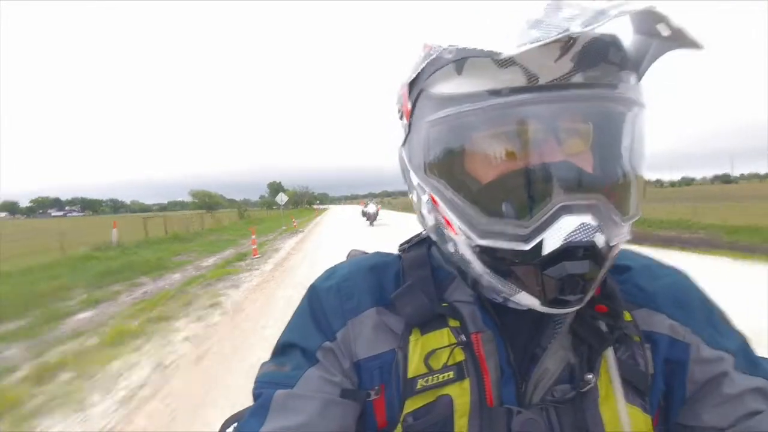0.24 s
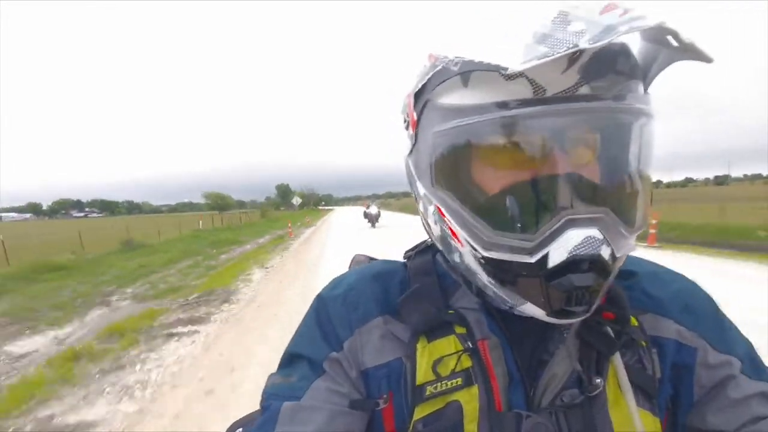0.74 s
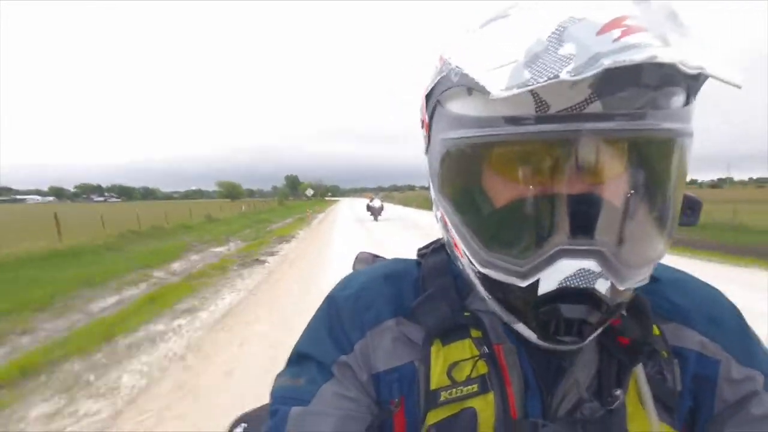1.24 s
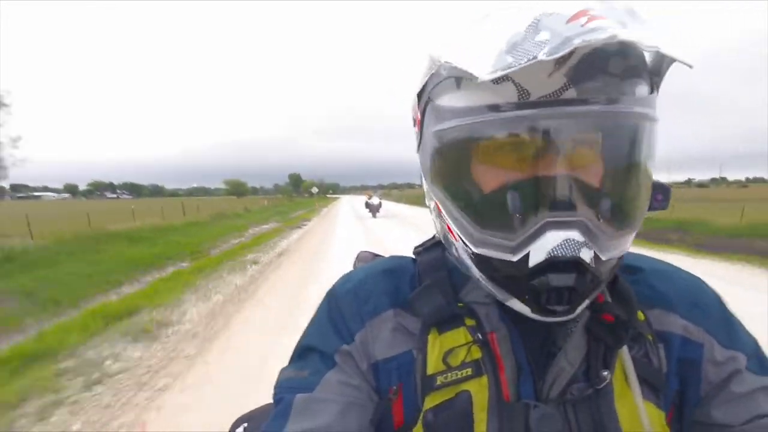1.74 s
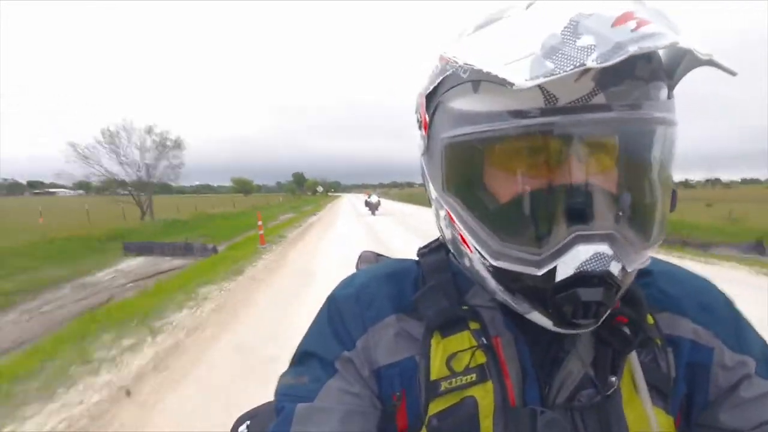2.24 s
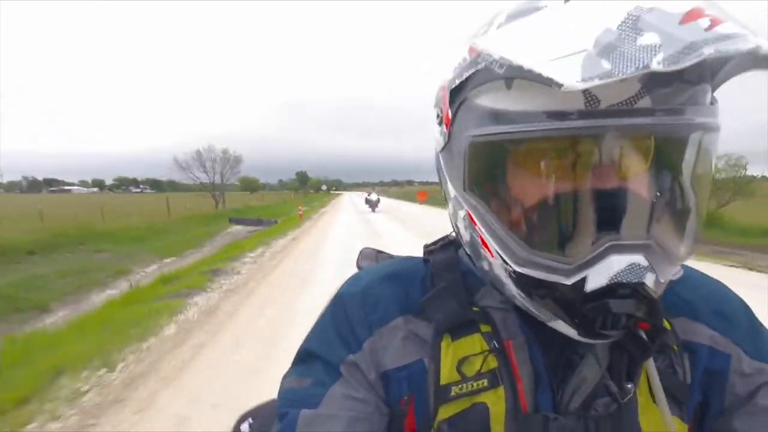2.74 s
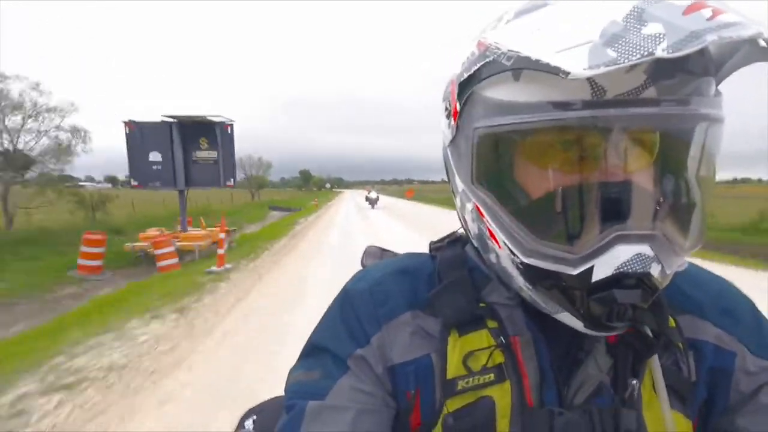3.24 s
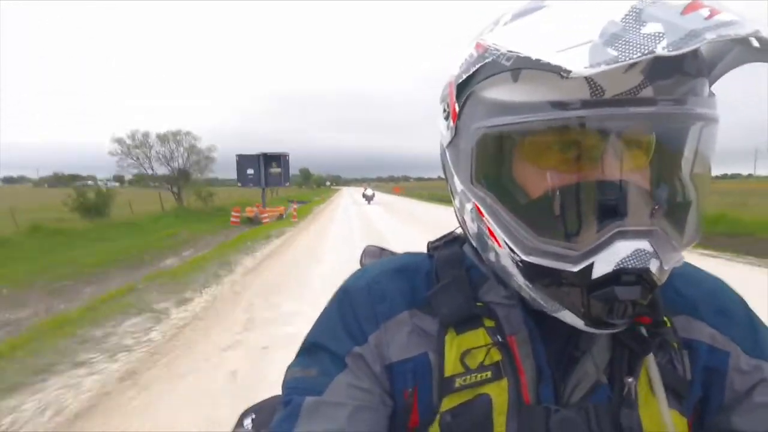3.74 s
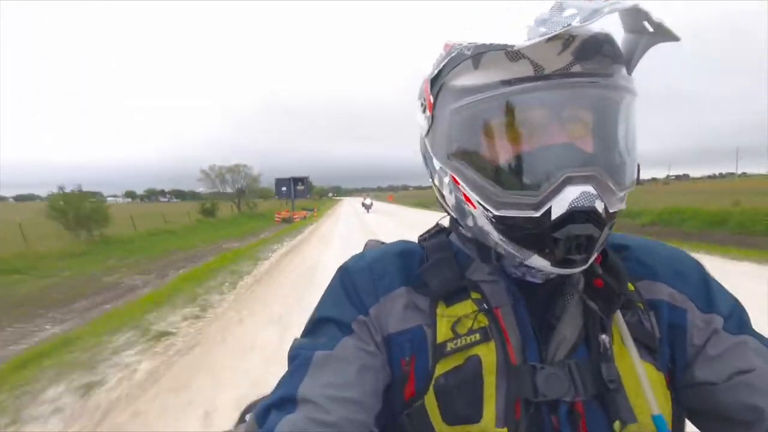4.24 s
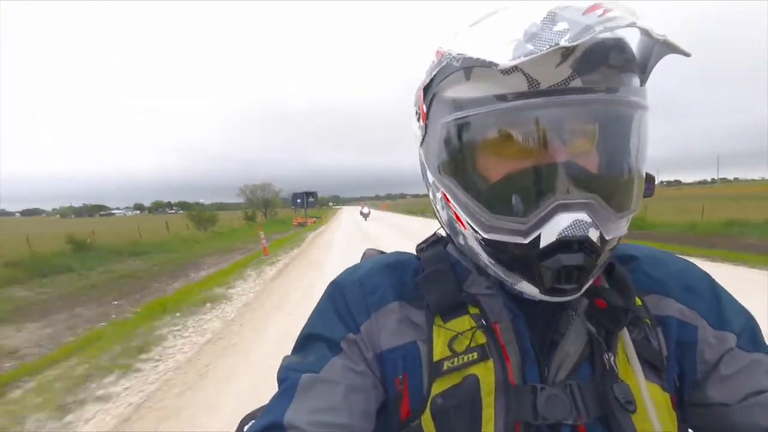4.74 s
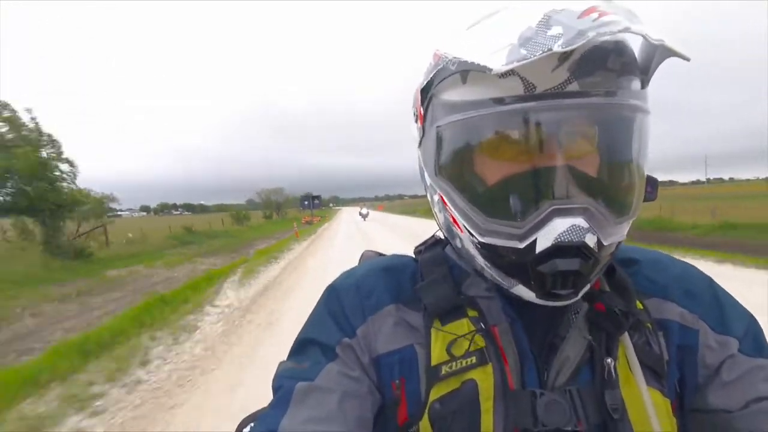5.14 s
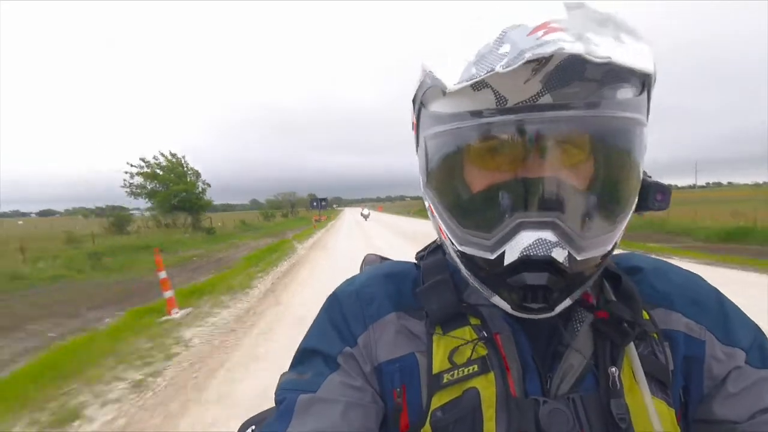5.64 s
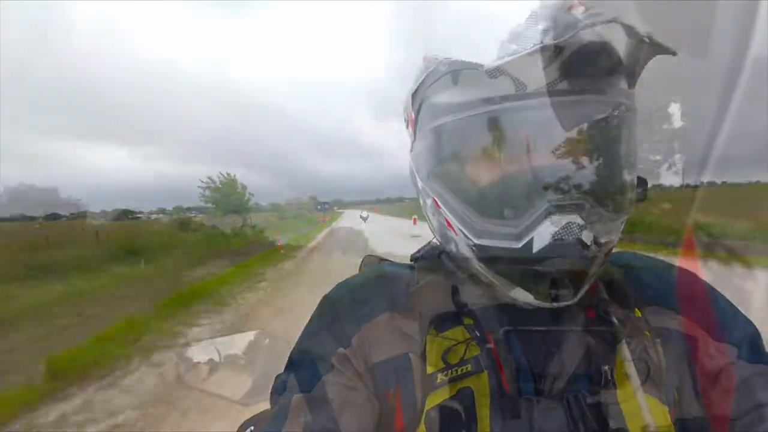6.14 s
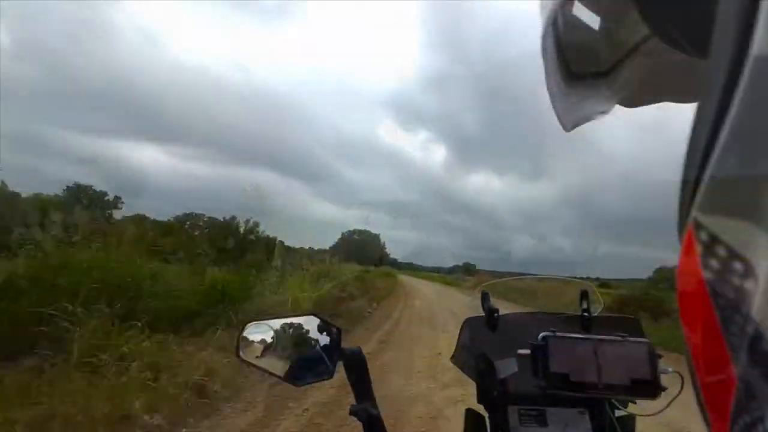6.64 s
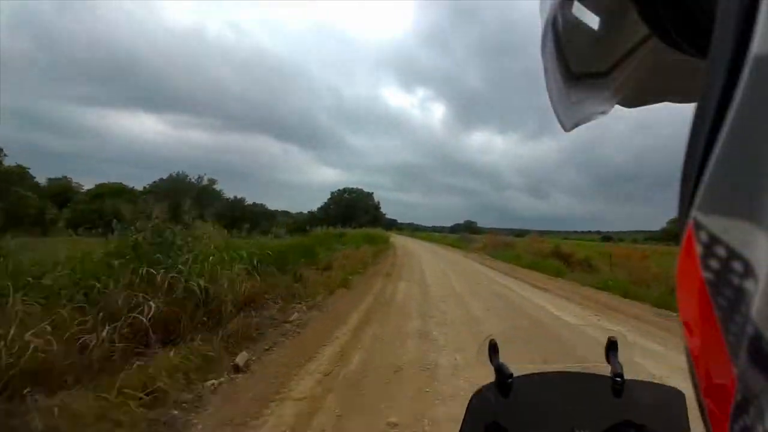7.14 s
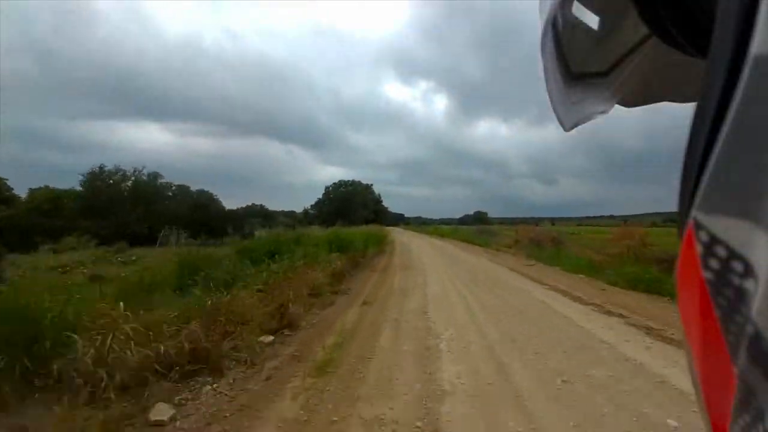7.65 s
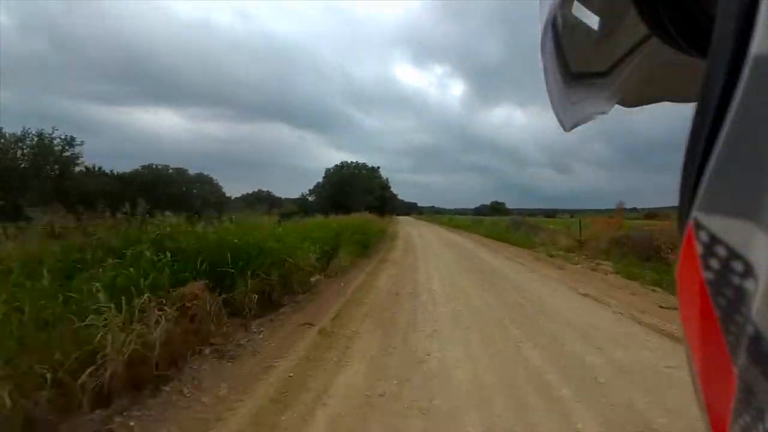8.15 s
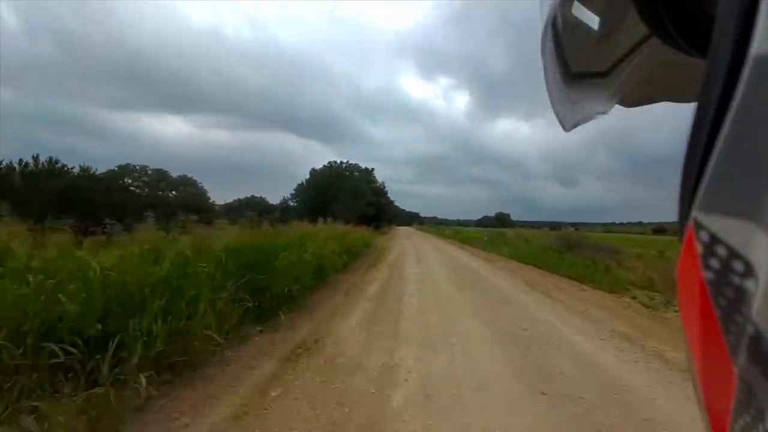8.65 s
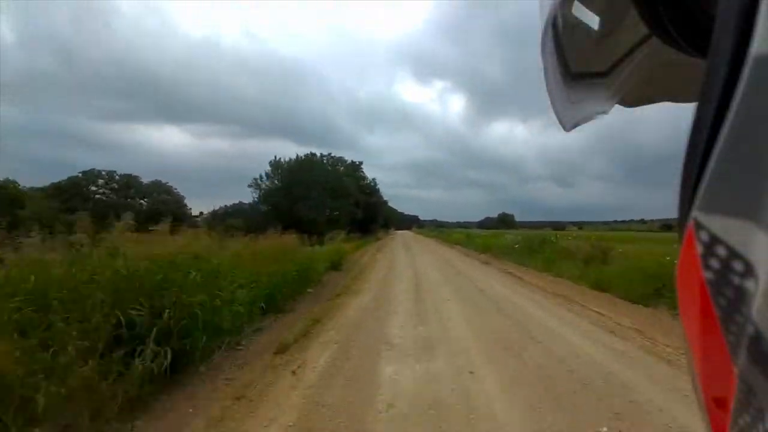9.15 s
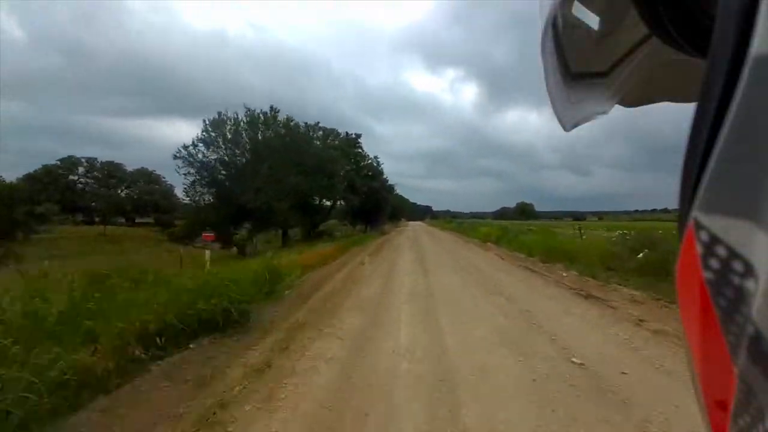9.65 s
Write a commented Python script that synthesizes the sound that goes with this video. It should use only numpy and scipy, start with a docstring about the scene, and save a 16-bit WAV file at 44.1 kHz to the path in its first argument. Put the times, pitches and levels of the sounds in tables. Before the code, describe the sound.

From 0 s, a microphone on a motorcycle's handlebar is pounded by full airstream: deep thudding and rumbling wind, fluttering bass and a thinner layer of roar and hiss. A twin-cylinder engine hums beneath, rising slowly. Around 1.2 s the throttle opens with a raspy, growling surge, and pitch climbs until about 3.8 s, when the throttle closes and the engine thins into coasting, gradually falling. Stones knock the housing at 0.7 s, in a cluster at 3.0-3.5 s, and repeatedly from 4.2 to 6.2 s; sharper grit snaps at 2.1-3 s. Between 6.1 and 6.7 s this loud scene fades out. A far quieter, sheltered place beside the helmet takes over: soft short wind buffets from 6.8 to 8.6 s, a few tiny clicks, then a steady intake drone strengthening and rising slightly amid hollow, airy gravel-road rush, growing gently until 9.9 s.

```python
"""A gravel road on a twin-cylinder motorcycle, heard first at the handlebar in the full airstream.
Exhaust tones and noisy firing puffs pull under six bands of turbulent noise, from thud to hiss.
This fades out as a much quieter, sheltered place beside the helmet fades in: noise gusts buffet softly,
shaped noise makes the road rush, and sines locked to the engine cycle make the intake drone.
Small decaying rings make the ticks of stones and grit."""
import sys
import numpy as np
from scipy import signal
from scipy.fft import rfft, irfft, next_fast_len
from scipy.io import wavfile
from scipy.ndimage import uniform_filter1d, minimum_filter1d, map_coordinates

SR = 44100
rng = np.random.default_rng(int(sys.argv[2]) if len(sys.argv) > 2 else 0)


def waveform_to_disk(signal):
    """Save audio, clipped to [-1, 1], as 16-bit WAV at the path in sys.argv[1]."""
    frames = np.transpose(np.atleast_2d(signal))
    scaled = np.clip(frames, -1, 1) * 32767
    samples = np.round(scaled).astype(np.int16)
    wavfile.write(sys.argv[1], SR, samples)


N = 436149

# Engine speed at each place: (time [s], four-stroke cycles [1/s])
BAR_SPEED = [(0, 26.5), (.4, 27.25), (.7, 27.9), (1, 28.5), (1.2, 29.8), (1.95, 31.1), (2.7, 33.1),
             (3.2, 34.6), (3.7, 35.8), (4.2, 36.4), (5.65, 33.4), (6.8, 31.9)]
HELMET_SPEED = [(7.5, 27.6), (8.1, 28), (8.65, 29.25), (9, 29.6), (9.5, 30.2), (9.89, 30.8)]
# Engine effort at the handlebar: (time [s], throttle level [dB])
BAR_THROTTLE = [(0, -20), (.9, -9), (1.22, 2.5), (1.75, 2), (2.1, -2.5), (2.7, 0), (3.6, -2), (3.95, -24),
                (6.8, -24)]
# Engine tones at multiples 2 to 27 of the cycle, before throttle and fairing: (rms level [dB])
ORDER_LEVELS = [-23, -24, -22, -19, -22, -27, -27, -44, -43, -44, -48, -47, -33, -37, -35, -38, -40, -49,
                -47, -40, -38, -46, -43, -46, -49, -49]
# How the fairing passes the engine's tones: (frequency [Hz], gain [dB])
FAIRING = [(88, -2), (101, 4), (120, -1), (152, 3.5), (180, -3), (275, -1), (415, -5), (460, 1), (490, 1),
           (530, -4), (590, 0), (645, 4), (690, -4), (740, 1), (780, 1), (830, -9)]
# Resonances of the intake: (frequency [Hz], width [Hz], level [dB])
AIRBOX = [(468.7, 80, 4), (662, 177, -4.5), (969, 100, -10), (1450, 160, -16.5)]
# Tones that stand out at part throttle: (multiple of the cycle, peak level [dB])
WHINES = [(20, -36), (23, -40)]
# Tones that stay when coasting: (multiple of the cycle, peak level [dB])
COAST_TONES = [(14, -50), (15, -46), (20, -56)]

# Low wind bands at the handlebar: (time [s], thud level [dB], rumble level [dB], flap level [dB])
BAR_BASS = [(0, -13.5, -13, -37), (.4, -13.5, -15, -24.5), (.65, -14.5, -13, -33), (1.3, -20, -12, -32),
            (2.06, -20, -12, -22.5), (2.3, -13, -17, -28), (3, -16.5, -10.5, -19.5),
            (3.5, -14, -17.5, -22.5), (4.3, -18, -10.5, -18), (4.7, -15, -11, -20.5),
            (5.9, -18, -12.5, -30.5), (6.25, -18.5, -17.5, -23), (6.8, -17, -24, -45)]
# Upper wind bands at the handlebar: (time [s], roar level [dB], hiss level [dB])
BAR_TREBLE = [(0, -39.5, -45), (.55, -37.5, -44), (.75, -35.5, -42), (1.27, -35.5, -40),
              (2.42, -36.5, -38.5), (2.9, -35, -38), (3.7, -43.5, -39), (4.35, -38, -38.5),
              (4.7, -40, -40.5), (6, -40, -44.5), (6.8, -42, -48.5)]
# Brief dips of the low wind: (time [s], half-width [s], depth [dB])
WIND_DIPS = [(.508, .015, 16), (5.486, .01, 9)]
# Relative wind spectra, deepest band first: (frequency [Hz], density [dB per Hz])
THUD = [(8.8, -43), (15, -4.5), (130, -4), (170, -39.5), (290, -120)]
RUMBLE = [(47, -24), (80, -2), (172, 2.5), (221, -3.5), (260, -22.5), (340, -21.5), (570, -120)]
FLAP = [(140, -31.5), (230, 2.5), (366, -11), (521, -26.5), (600, -36.5), (780, -62), (1320, -120)]
GROWL = [(240, -33.5), (400, -5), (512, -2), (568, -9.5), (787, -8.5), (1400, -12), (1820, -48),
         (3080, -120)]
ROAR = [(760, -16.5), (1300, -9.5), (1430, -4.5), (2540, -6), (4500, -22), (5850, -33), (9900, -120)]
HISS = [(2060, -8), (3500, -3), (4360, -8), (5420, -3.5), (7060, -6.5), (9900, -23.5), (11300, -33),
        (14700, -58), (22000, -120)]

# Stones on the housing: (time [s], crack peak [dB], body relative to crack [dB], body frequency [Hz])
STONES = [(0.7143, -20, -8, 900), (1.341, -30, 11, 650), (1.475, -28, 9, 650), (3.0034, -21, 7, 750),
          (3.108, -27, 7, 1400), (3.339, -27, 6, 900), (3.3967, -26, 5, 1200), (3.424, -26, 8, 800),
          (3.4989, -22, 8, 620), (4.1834, -23, -6, 900), (4.6049, -19, 0, 720), (4.649, -30, 8, 950),
          (4.7262, -27, 3, 1100), (4.948, -31, 11, 950), (5.268, -27, -1, 900), (5.3394, -32, 12, 780),
          (5.7208, -30, 10, 760), (5.8896, -29, 6, 1100), (6.2329, -25, 4, 700), (8.597, -43, 6, 720)]
# Sharper snaps of grit: (time [s], peak level [dB], frequency [Hz])
GRIT = [(2.119, -26, 5350), (2.149, -28, 5350), (2.2124, -28, 5350), (2.4304, -25, 5350),
        (2.795, -27, 5350), (2.9522, -27, 5350), (6.785, -55, 4250), (6.835, -59, 5500), (7.003, -54, 6000),
        (7.44, -58, 5600)]

# Engine effort at the helmet: (time [s], drone level [dB])
HELMET_ENGINE = [(7.3, -16), (7.6, -7), (8, -3), (8.45, 0), (9.3, -.5), (9.89, 1)]
# Intake drone before the effort is added: (multiple of the cycle, rms level [dB])
HELMET_DRONE = [(12, -63), (17, -56), (18, -54), (19, -52), (20, -53.5), (21, -63), (22, -61)]
# Gusts round the helmet: (start [s], length [s], level [dB])
HELMET_GUSTS = [(6.795, 0.01, -45), (6.95, 0.05, -41), (7.06, 0.015, -37), (7.14, 0.03, -39),
                (7.2, 0.015, -38), (7.335, 0.01, -39), (7.554, 0.048, -45.5), (7.737, 0.12, -40),
                (7.907, 0.071, -45), (8.003, 0.025, -36.5), (8.06, 0.085, -38), (8.2, 0.08, -39),
                (8.33, 0.06, -41), (8.47, 0.02, -43), (8.574, 0.02, -46)]
# Relative spectra of the buffeting and road rush: (frequency [Hz], density [dB per Hz])
BUFFET = [(24, -55), (40, -21), (80, 3), (150, 4.5), (262, 1.5), (533, -1), (729, -10), (1200, -9.5),
          (1560, -52), (2640, -120)]
RUSH = [(150, -33), (250, -15.5), (344, -1), (466, -7), (564, -5), (694, -4), (1330, -11.5), (1560, -6),
        (2520, -13.5), (3310, -24), (6680, -33), (7580, -42), (11300, -47.5), (14700, -84), (22000, -120)]
# Resonances of a hollow by the helmet: (frequency [Hz], width [Hz], level [dB])
HELMET_HOLLOW = [(1572, 190, 0), (2565, 270, -9.5)]

OPEN_S, SHUT_S = 1.16, 3.78  # throttle opened wide, throttle closed
RASP_DB, RASP_COAST_DB = -32, 8  # level before the blip, loss when coasting
BLIP_DB, BLIP_S = 10, 0.66  # extra rasp at the opening, its decay time
GROWL_DB, GROWL_SINKS, GROWL_COAST_DB = -33, 0.83, 6  # start level, dB per s until shut, coasting loss
FADE_START_S, FADE_END_S, FADE_POWER = 6.14, 6.737, 1.45  # handlebar fade-out
RISE_START_S, RISE_S = 6.19, 1  # helmet fade-in: start, length
GUST_ATTACK_S, GUST_RELEASE_S, LULL_DB = 0.0049, 0.036, -48  # the lull is the floor between gusts
GUST_HISS_DB = -30.5  # thin hiss relative to its gust
RUSH_DB, RUSH_GROWS = -46, 1  # gain when the fade-in ends, steady creep in dB per s
HOLLOW_DB = -8  # hollow band relative to the rush
HELMET_CUT_HZ = 55  # the helmet microphone loses the bass below about here
KNEE, SQUEEZE = 0.71, 0.48  # limiter threshold (full scale 1), share of the excess in dB taken away
TOP_HZ = 14900


def handlebar():
    """The pulling engine in the full airstream, fading away together."""
    fade = (1 - ramp(FADE_START_S, FADE_END_S - FADE_START_S)) ** FADE_POWER
    return fade * (handlebar_engine() + handlebar_wind())


def handlebar_engine():
    """Cycle-locked tones, with uneven firing puffs ringing the intake as rasp."""
    t = np.arange(N) / SR
    (rate,), (throttle_db,) = curves(BAR_SPEED), curves(BAR_THROTTLE)
    angle = cycle_angle(rate)
    coasting = closed_throttle()
    part_throttle = ramp(0, 0.5) * (1 - ramp(OPEN_S, 0.1))

    blip = ramp(OPEN_S - 0.15, 0.15) * np.exp(-np.maximum(t - OPEN_S, 0) / BLIP_S)
    rasp_db = RASP_DB + BLIP_DB * blip - RASP_COAST_DB * coasting
    pulses = firings(rate, second_db=-1.5, jitter=0.01, scatter_db=0.5)
    puffs = rasped(pulses, rough=0.52 + coasting, puff=0.008)

    engine = tones(rate, throttle_db, waver_db=1.6)
    engine += ramp(0, 0.38) * amp(rasp_db) * resonant(puffs, AIRBOX)
    for order, db in WHINES:
        engine += part_throttle * amp(db + 1.1 * wobble(6)) * np.sin(order * angle)
    for order, db in COAST_TONES:
        engine += coasting * amp(db + 3 * wobble(5)) * np.sin(order * angle)
    return engine


def tones(rate, throttle_db, waver_db):
    """Multiples of the cycle, each wavering by itself; the higher ones follow the throttle more."""
    angle, out = cycle_angle(rate), np.zeros(N)
    for order, db in enumerate(ORDER_LEVELS, start=2):
        follow = np.clip(order / 15 - 0.15, 0.25, 1.5)
        fairing_db = np.interp(order * rate, *np.transpose(FAIRING))
        level = amp(db + fairing_db + follow * throttle_db + waver_db * wobble(5.02))
        phase = order * angle + 0.27 * wobble(9) + rng.uniform(0, 2 * np.pi)
        out += np.sqrt(2) * level * np.sin(phase)
    return out


def firings(rate, second_db, jitter, scatter_db):
    """Two firings a cycle, 270 and 450 crank degrees apart, each a little off in time and size."""
    turns = np.cumsum(rate) / SR
    cycle = np.arange(int(turns[-1]))
    luck = rng.standard_normal((len(cycle), 4))  # two columns of timing, two of size
    pulses = np.zeros(N)
    for k, (lag, db) in enumerate([(0, 0), (3 / 8, second_db)]):
        firing_turn = cycle + lag + jitter * luck[:, k]
        at = np.interp(firing_turn, turns, np.arange(N)).astype(int)
        pulses[at] += amp(db + scatter_db * luck[:, k + 2])
    return pulses


def rasped(pulses, rough, puff):
    """Each firing also lets out noise decaying over puff seconds; rough is its share of the power."""
    gate = signal.lfilter([1], [1, -np.exp(-1 / (puff * SR))], pulses)
    rough = np.clip(rough, 0, 1)
    noise = unit(gate * rng.standard_normal(N))
    return np.sqrt(1 - rough) * unit(pulses) + np.sqrt(rough) * noise


def handlebar_wind():
    """Six bands of turbulence, from the deepest thudding to the hiss; the low ones dip briefly."""
    t = np.arange(N) / SR
    (thud_db, rumble_db, flap_db), (roar_db, hiss_db) = curves(BAR_BASS), curves(BAR_TREBLE)
    growl_db = GROWL_DB - GROWL_SINKS * np.minimum(t, SHUT_S) - GROWL_COAST_DB * closed_throttle()
    dip_db = sum(db * np.exp(-((t - s) / width) ** 2) for s, width, db in WIND_DIPS)

    wind = amp(thud_db) * air(THUD, patchy_db=1.0, flutter_db=0.3, flutter_rate=19)
    wind += amp(rumble_db) * air(RUMBLE, patchy_db=0.45, flutter_db=0.15, flutter_rate=16)
    wind += amp(flap_db) * air(FLAP, patchy_db=1.5, flutter_db=2.0, flutter_rate=18)
    wind *= amp(-dip_db)
    wind += amp(growl_db) * air(GROWL, patchy_db=2.0, flutter_db=0.0, flutter_rate=25)
    wind += amp(roar_db) * air(ROAR, patchy_db=0.9, flutter_db=0.8, flutter_rate=22)
    wind += amp(hiss_db) * air(HISS, patchy_db=0.5, flutter_db=0.2, flutter_rate=30)
    return wind


def ticks():
    """Stones knock the housing, a short crack over a duller body; grit snaps higher."""
    out, t = np.zeros(N + SR), np.arange(SR // 50) / SR

    def ring(hz, life):
        """A sine whose envelope peaks at 1 after life seconds, then dies."""
        return np.sin(2 * np.pi * hz * t) * (t / life) * np.exp(1 - t / life)

    for s, db, body_db, body_hz in STONES:
        knock = ring(1900, 0.00028) - amp(body_db) * ring(body_hz, 0.42 / body_hz)
        out[round(s * SR):][:len(t)] += amp(db) * knock
    for s, db, hz in GRIT:
        out[round(s * SR):][:len(t)] += amp(db) * ring(hz, 0.0003)
    return out[:N]


def helmet():
    """In the lee of the helmet: buffeting, intake drone and road rush, with the deepest bass cut."""
    heard = buffeting() + ramp(RISE_START_S, RISE_S) * (intake_drone() + road_rush())
    return filtered(heard, lambda f: 1 / (1 + (HELMET_CUT_HZ / (f + 1)) ** 4))


def buffeting():
    """Gusts swell low turbulence above a quiet lull, each bringing a thin hiss."""
    gusts = np.zeros(N)
    for s, length, db in HELMET_GUSTS:
        gusts += amp(db) * ramp(s, GUST_ATTACK_S) * (1 - ramp(s + length, GUST_RELEASE_S))
    lull = ramp(RISE_START_S, 0.27) * amp(LULL_DB)
    buffet = np.maximum(gusts, lull) * air(BUFFET, patchy_db=1.0, flutter_db=2.0, flutter_rate=80)
    fizz = amp(GUST_HISS_DB) * gusts * air(HISS, patchy_db=1.5, flutter_db=2.8, flutter_rate=60)
    return buffet + fizz


def intake_drone():
    """Sines at multiples of the engine cycle, each wavering in level and phase."""
    (rate,), (effort_db,) = curves(HELMET_SPEED), curves(HELMET_ENGINE)
    angle, drone = cycle_angle(rate), np.zeros(N)
    for order, db in HELMET_DRONE:
        level = amp(db + effort_db + 1.1 * wobble(4))
        drone += np.sqrt(2) * level * np.sin(order * angle + 0.2 * wobble(3))
    return drone


def road_rush():
    """Broad noise that slowly grows, with a wavering hollow band of resonances under it."""
    rush = air(RUSH, patchy_db=1.0, flutter_db=0.15, flutter_rate=12)
    hollow_db = HOLLOW_DB + 1.9 * wobble(9.8) + 1.5 * wobble(1.44)
    rush += amp(hollow_db) * resonant(rng.standard_normal(N), HELMET_HOLLOW)
    rush_db = RUSH_DB + RUSH_GROWS * (np.arange(N) / SR - RISE_START_S - RISE_S)
    return amp(rush_db) * rush


def air(spectrum, patchy_db, flutter_db, flutter_rate):
    """Turbulent noise of rms 1 with patches of random gain and a flutter of level."""
    z = signal.stft(rng.standard_normal(N), nperseg=512)[2]
    field = uniform_filter1d(rng.standard_normal(z.shape), size=8, axis=0)  # smooth over frequency
    field = uniform_filter1d(field, size=10, axis=1)  # smooth over time
    patchy = signal.istft(z * amp(patchy_db * unit(field)), nperseg=512)[1][:N]
    noise = patchy * amp(flutter_db * wobble(flutter_rate))
    hz, db = np.transpose(spectrum)
    return unit(filtered(noise, lambda f: amp(np.interp(np.log(f + 1), np.log(hz + 1), db))))


def resonant(x, modes):
    """x through a bank of resonances twice over, for deep valleys; rms 1."""
    def bank(f):
        """Band-pass resonances of alternating sign, at half their dB for each pass."""
        total = 0
        for k, (center, width, db) in enumerate(modes):
            damping = 1j * f * width
            total = total + (-1) ** k * amp(db / 2) * damping / (center ** 2 - f * f + damping)
        return total

    return unit(filtered(x, lambda f: bank(f) ** 2))


def filtered(x, response):
    """x shaped by a response of frequency, by way of its spectrum."""
    m = next_fast_len(N + SR // 2)  # padded so that the tail does not wrap round
    return irfft(rfft(x, m) * response(np.fft.rfftfreq(m, 1 / SR)), m)[..., :N]


def closed_throttle():
    """0 while pulling, gliding to 1 around the closing of the throttle."""
    return ramp(SHUT_S - 0.1, 0.4)


def cycle_angle(rate):
    """Running phase of the engine cycle in radians."""
    return 2 * np.pi * np.cumsum(rate) / SR


def wobble(rate):
    """A smooth random curve, rate knots a second."""
    knots = rng.standard_normal(int(N * rate / SR) + 4)
    return map_coordinates(knots, [np.arange(N) * rate / SR])


def curves(rows):
    """One value per sample for each column after the time."""
    s, *cols = np.transpose(rows)
    return [np.interp(np.arange(N) / SR, s, c) for c in cols]


def ramp(start, length):
    """0 before start, rising straight to 1 over length seconds."""
    return np.clip((np.arange(N) / SR - start) / length, 0, 1)


def unit(x):
    """Scaled to rms 1."""
    return x / np.sqrt(np.mean(x ** 2) + 1e-20)


def amp(db):
    """Decibels to gain."""
    return 10 ** (np.asarray(db) / 20)


def scene():
    """The handlebar giving way to the helmet, with the ticks over both."""
    return (handlebar() + helmet() + ticks())[None]


def record(dry):
    """A soft limiter smoothly ducks the loudest peaks; nothing is kept above the band limit."""
    hold = SR // 100
    needed = np.minimum(1, KNEE / (np.abs(dry) + 1e-9)) ** SQUEEZE
    gain = uniform_filter1d(minimum_filter1d(needed, size=2 * hold), size=hold)
    return filtered(dry * gain, lambda hz: hz < TOP_HZ)


dry = scene()
out = record(dry)
waveform_to_disk(out)
```